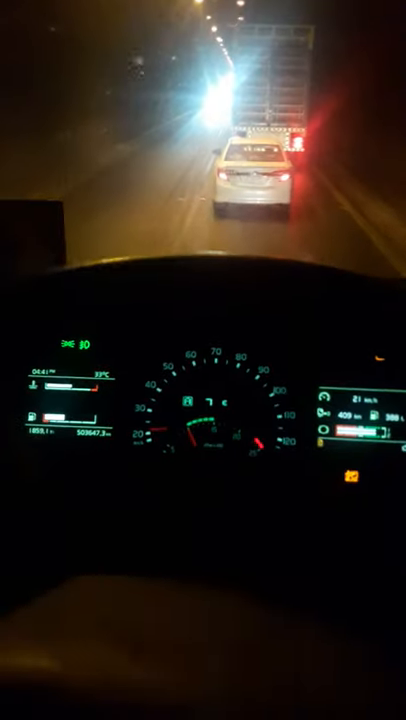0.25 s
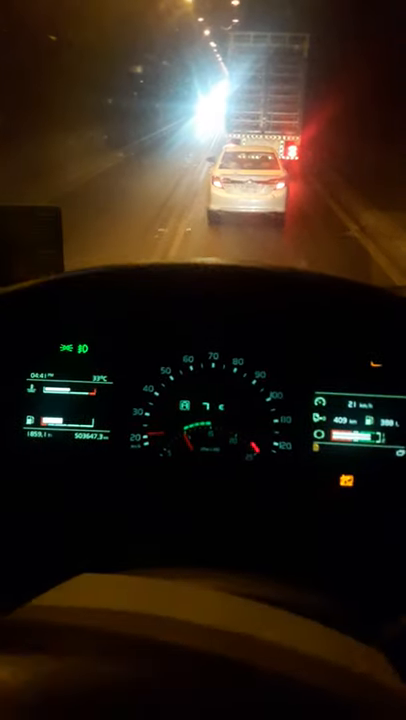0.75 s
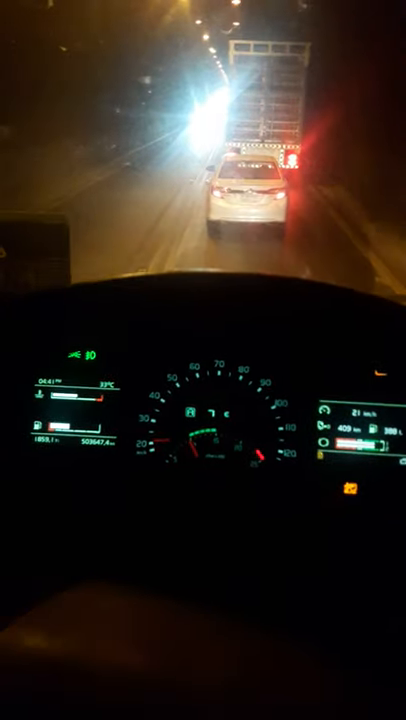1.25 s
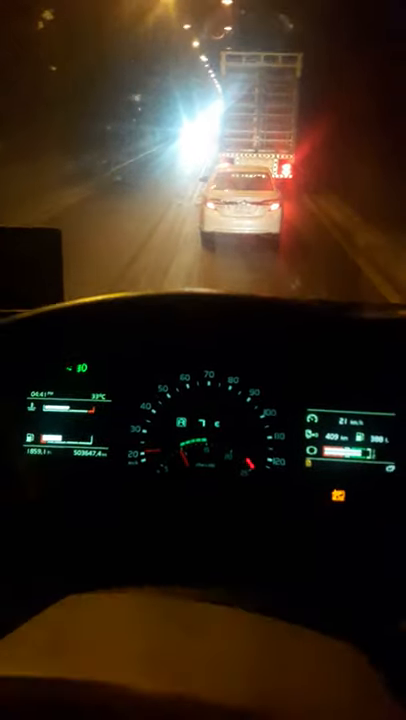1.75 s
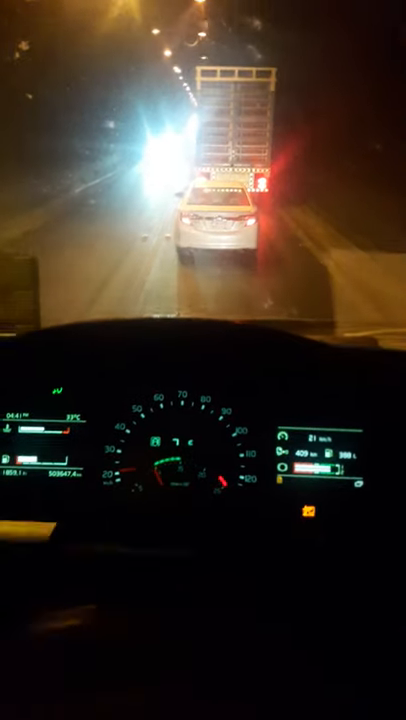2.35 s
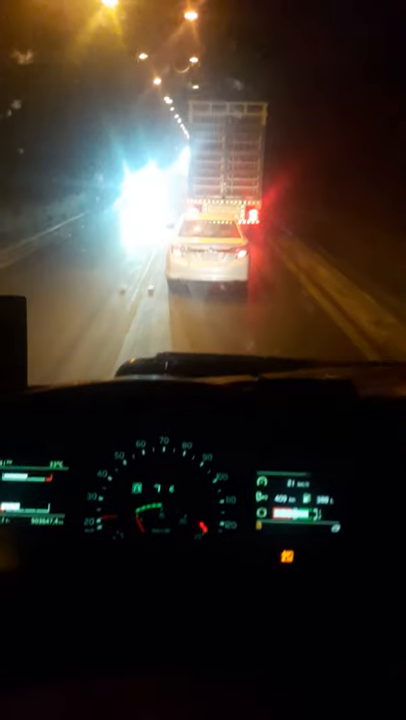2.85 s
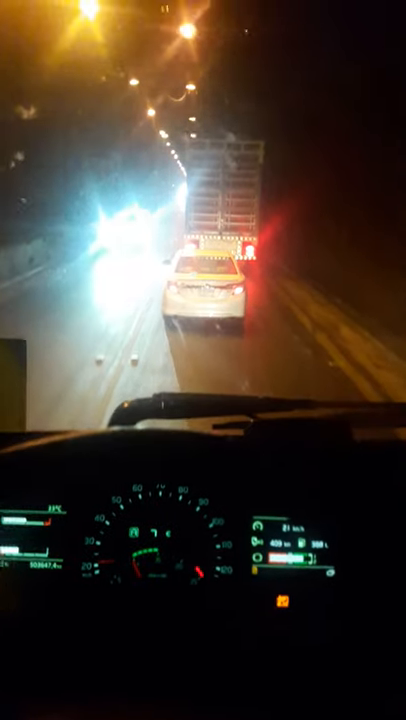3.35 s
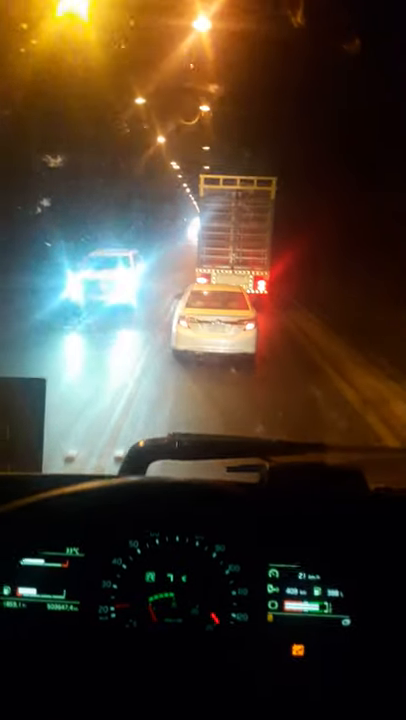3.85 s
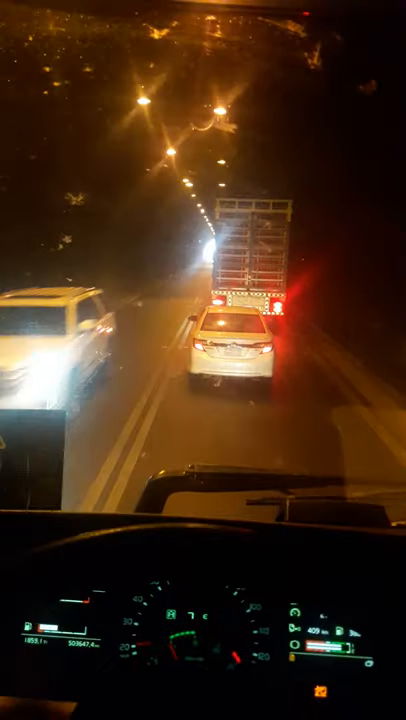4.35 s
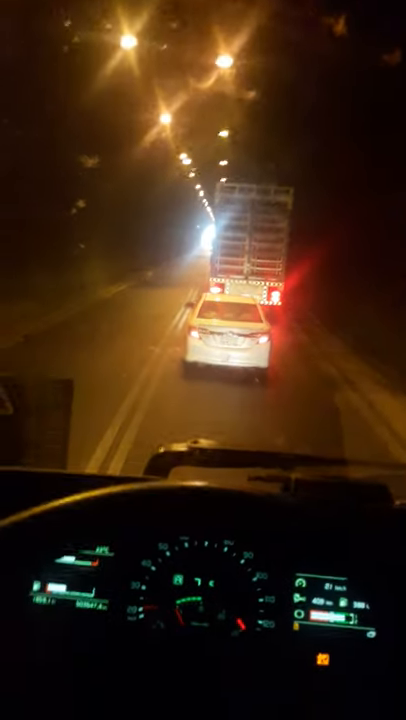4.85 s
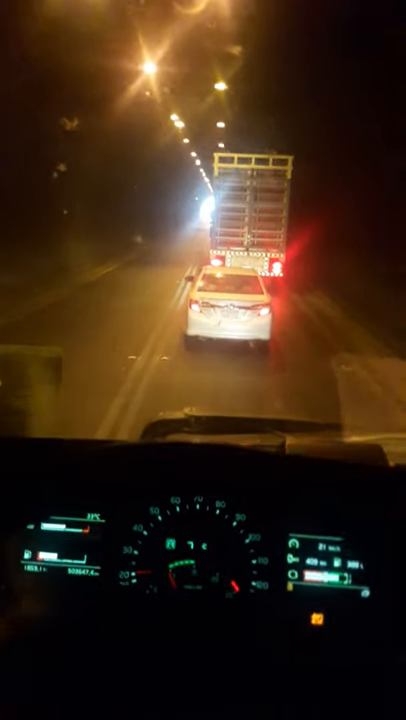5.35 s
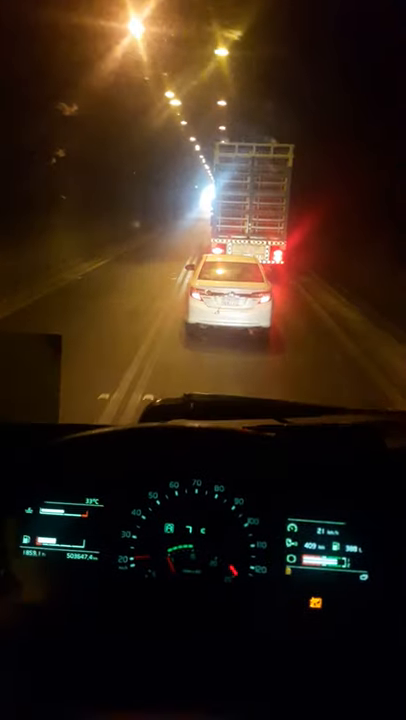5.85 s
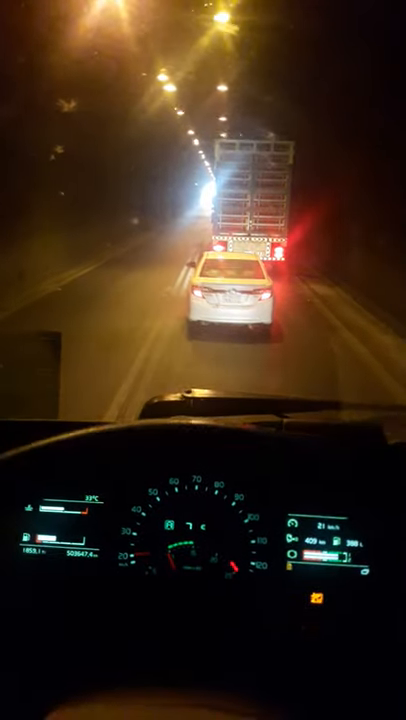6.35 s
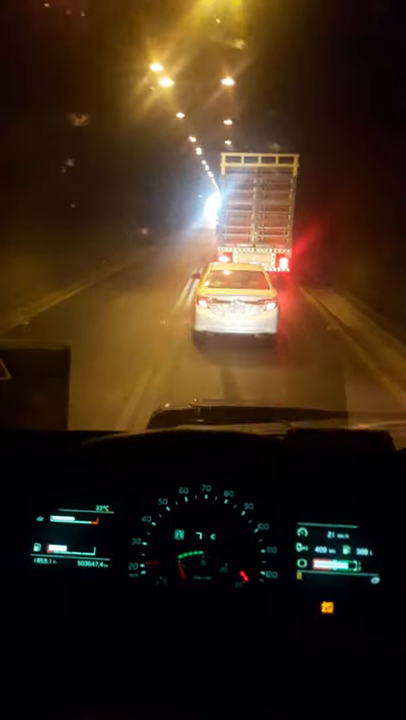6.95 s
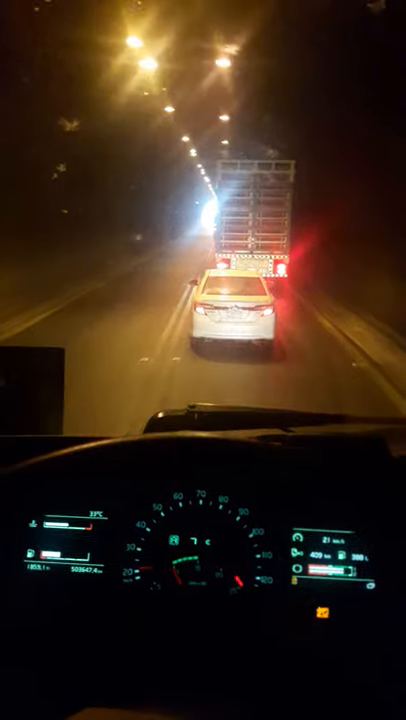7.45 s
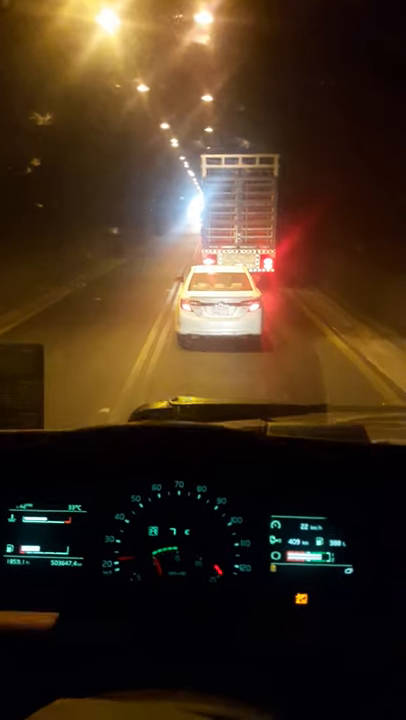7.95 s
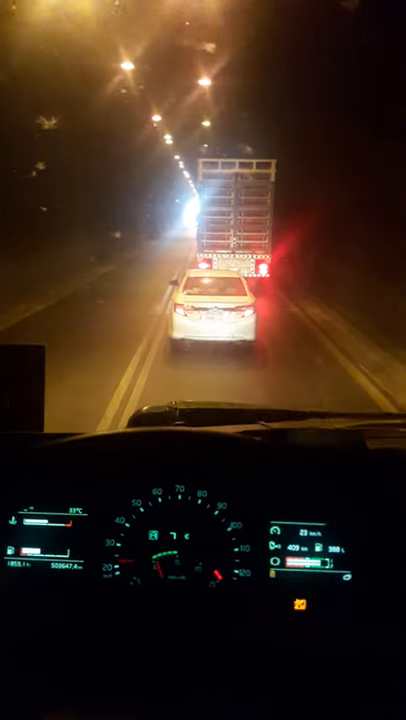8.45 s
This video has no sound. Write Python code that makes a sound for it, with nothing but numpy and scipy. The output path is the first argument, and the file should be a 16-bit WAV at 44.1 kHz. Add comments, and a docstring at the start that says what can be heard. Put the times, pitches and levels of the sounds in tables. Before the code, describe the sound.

Inside a moving heavy truck cab, heard from the driver's seat in close stereo. From 0 s a deep diesel drone near 100 Hz wavers over shaking panels, broad tyre roar with slight clatter, and a very thin hiss. A faint unsteady whistle around 1300 Hz swells to about 1 s, holds briefly and fades by 2 s. Driveline hums drift in and out, while a barely audible breathy turbo whine hovers above 4 kHz. Tiny soft ticks come about once a second from 0.7 s. The drone weakens from 4 s; the trim creaks once, quietly, at 5.1 s. At 6.1 s the bass falls abruptly, leaving the road roar exposed. At 7.3 s the throttle reopens: a strong boom arrives quickly, climbs slightly in pitch and fades after 7.8 s, over firmer rumble. A weaker whistle returns briefly near 8.5 s, and the sound ends around 8.7 s with the engine still running.

```python
"""A heavy diesel engine drones near 100 Hz, heard from the driver's seat inside the cab. The drone, its weaker
orders and the driveline hums are wavering sine waves; rumble, tyre roar and hiss are coloured noise.
The bass drops for about a second when the throttle lifts, then comes back harder with a boom rising in pitch.
A breathy turbocharger whine is narrow noise, and a thin whistle that comes and goes is an unsteady sine.
Something in the dashboard ticks faintly once a second and the trim creaks once: short puffs of noise."""
import sys
import numpy as np
from scipy import signal
from scipy.fft import rfft, irfft
from scipy.io import wavfile

SR = 44100
rng = np.random.default_rng(int(sys.argv[2]) if len(sys.argv) > 2 else 0)


def store_pcm(level_fs):
    """Save levels as 16-bit WAV."""
    pcm = np.round(np.clip(level_fs, -1, 1) * 32767).astype(np.int16)
    wavfile.write(sys.argv[1], SR, np.atleast_2d(pcm).T)


N = 382788
TIME = np.arange(N) / SR  # seconds
BIN_HZ = np.maximum(np.arange(N // 2 + 1) * SR / N, 1)  # frequency of each spectrum bin

# the throttle opens again at this moment
SURGE_S = 7.33


def undb(db):
    """Turn decibels into a gain."""
    return 10 ** (np.asarray(db) / 20)


def unit(x):
    """Scale to an rms (average strength) of 1."""
    return x / np.sqrt(np.mean(x ** 2))


def curves(rows):
    """Draw straight lines between the rows of a timed table: one curve over time per column."""
    seconds, *columns = np.transpose(rows)
    return [np.interp(TIME, seconds, column) for column in columns]


def over_hz(rows):
    """Join the rows of a frequency table with straight lines on a log frequency axis."""
    hz, value = np.transpose(rows)
    return np.interp(np.log(BIN_HZ), np.log(np.maximum(hz, 1)), value)


def colour(x, db):
    """Filter by a gain in dB at each frequency, then scale to rms 1."""
    return unit(irfft(rfft(x) * undb(db), N))


def walk(rate):
    """Smooth random motion with changes up to about rate in Hz, scaled to rms 1."""
    smoothing = 1 + (BIN_HZ / rate) ** 4
    return unit(irfft(rfft(rng.standard_normal(N)) / smoothing, N))


def swell(s, width_s):
    """A bell-shaped rise and fall around a moment."""
    return np.exp(-((TIME - s) / width_s) ** 2)


def turn(hz):
    """Add up a frequency curve into a running phase in radians."""
    return 2 * np.pi * np.cumsum(hz) / SR


def tone(phase, db, waver_db, jitter, rate):
    """A sine near the given rms level; its strength (dB) and phase (radians) waver at random."""
    gain = np.sqrt(2) * undb(db + waver_db * walk(rate))
    return gain * np.sin(phase + jitter * walk(rate))


def cab_noise():
    """Noise arriving from all around at two microphone ports: alike in the bass, unlike in the treble."""
    # likeness of the two ports: (frequency [Hz], correlation [-1 to 1])
    likeness = [(60, .99), (180, .98), (300, .88), (550, .65), (850, .4), (1300, -.25), (1550, -.35),
                (1900, -.2), (2500, .25), (3400, -.15), (4400, .1), (6000, 0)]
    alike = np.clip(over_hz(likeness), -.99, .995)
    mid, side = rfft(rng.standard_normal((2, N)))
    mid = mid * np.sqrt(1 + alike)
    side = side * np.sqrt(1 - alike)
    return irfft(np.array([mid + side, mid - side]), N)


def engine(phase, drone_db, load_db):
    """The main order booms in the cab; unequal cylinders add weaker, restless orders around it."""
    # weaker engine orders: (multiple of the main order [ratio], level before the load is added [dB])
    orders = [(4 / 6, -50), (5 / 6, -47.5), (7 / 6, -42), (8 / 6, -41.5), (9 / 6, -43.5), (10 / 6, -39.5),
              (2, -43.5), (14 / 6, -47.5), (3, -45.5)]
    drone = tone(phase, drone_db, waver_db=.9, jitter=.1, rate=12)
    weaker = sum(tone(ratio * phase, db + load_db, waver_db=2.5, jitter=0.7, rate=2.08)
                 for ratio, db in orders)
    return drone + weaker


def driveline(phase):
    """Shafts and gears hum at multiples of the engine's speed, each in a slow swell, over one deep hum."""
    # deep hum under the drone: (time [s], pitch [Hz], level [dB])
    deep_hum = [(0, 60.52, -40), (3.5, 60.5, -38), (5.9, 64.1, -34.5), (8.68, 65, -44)]
    # hums geared to the engine:
    # (time of the top [s], half length [s], multiple of the main order [ratio], level at the top [dB])
    geared_hums = [(0.597, .6, 2.205, -33.5), (1.697, 1, 1.68, -37), (2.4, .7, .765, -34.5),
                   (2.349, 0.4, 2.385, -33), (3.101, 1.6, 2.214, -33.5), (3.453, .65, 2.41, -35),
                   (4.199, 1.2, 2.022, -33.5), (4.298, .35, 1.72, -28.5), (5.148, .4, 1.67, -31),
                   (5.402, .7, 2.405, -39.5), (6.5, .35, 1.675, -29.5), (7.551, .7, 2.215, -33)]
    deep_hz, deep_db = curves(deep_hum)
    deep = tone(turn(deep_hz), deep_db, waver_db=2, jitter=.35, rate=6)
    geared = sum(swell(s, half_s) * tone(ratio * phase, db, waver_db=1.5, jitter=.3, rate=6)
                 for s, half_s, ratio, db in geared_hums)
    return deep + geared


def rumble(phase, load_db):
    """Floor and panels shake with the load, throbbing with the firings."""
    # colour of the rumble: (frequency [Hz], relative level [dB per Hz])
    spectrum = [(15, -34.5), (30, -22.5), (45, -5), (60, 2), (78, 7.5), (105, 7.5), (140, 4.5), (170, 7),
                (195, -0.5), (230, 4), (265, -2), (330, -0.5), (450, -8), (600, -13), (850, -30.5),
                (3000, -75)]
    throb = 1 + 0.19 * np.cos(phase)
    return colour(cab_noise() * throb, over_hz(spectrum)) * undb(-26.5 + load_db)


def road(phase):
    """Tyre roar rings the panels; diesel clatter pulses in it, and a thin hiss lies on top."""
    # colours of the roar and of the hiss: (frequency [Hz], relative level [dB per Hz])
    roar_spectrum = [(60, -10), (120, -2), (330, -0.5), (430, -6.5), (560, -6.5), (1000, -7.5), (1400, -12),
                     (1750, -14), (2300, -16.5), (2700, -21), (3100, -29), (3500, -33.5), (5500, -42),
                     (8000, -54.5)]
    hiss_spectrum = [(2500, -13), (3700, -1.5), (4400, 6.5), (5200, 3), (7000, -0.5), (8200, 2),
                     (8650, 3.5), (9100, -3.5), (10500, -2.5), (12000, 2.5), (15500, 2)]
    # panel resonances rung by the tyres: (frequency [Hz], width [Hz], boost [dB])
    panels = [(515, 98, 2.5), (675.5, 16, 8), (740, 44, -0.5), (840, 59, 4), (1230, 46, 0.5)]
    panels_db = sum(db / (1 + (2 * (BIN_HZ - hz) / width) ** 2) for hz, width, db in panels)
    clatter = 1 + 0.067 * np.cos(phase)
    # the small cabin has many close modes, which ripple the spectrum
    ripple_db = np.interp(BIN_HZ, np.arange(0, SR // 2, 20), rng.standard_normal(SR // 40 + 1))
    roar = colour(cab_noise() * clatter, over_hz(roar_spectrum) + panels_db + ripple_db)
    hiss = colour(cab_noise(), over_hz(hiss_spectrum))
    return roar * undb(-34.5 + 0.51 * walk(31)) + hiss * undb(-68 + .3 * walk(15))


def turbo():
    """The turbocharger's faint, breathy whine: a narrow band of noise around a moving pitch."""
    # course of the whine: (time [s], middle pitch [Hz], level [dB])
    whine = [(0, 3916, -79), (1.8, 4355, -69), (4.6, 4150, -74.5), (7, 4420, -66.5), (8.68, 4450, -66.5)]
    hz, db = curves(whine)
    phase = turn(hz)
    ports = [walk(220) * np.cos(phase) + walk(220) * np.sin(phase) for port in range(2)]
    return undb(db) * np.array(ports)


def whistle():
    """A thin unsteady whistle swells, holds and dies away, with a lower pitch when weak."""
    # whistles: (time of reaching full strength [s], attack [s], hold [s], level [dB])
    whistles = [(0.951, .45, .38, -41), (8.471, .07, 0.11, -44.5)]
    release_s = 0.21
    full_hz, sag_hz = 1305, 34.93  # pitch at the strongest moment, and the most it can sag below that
    strength = 0
    for s, attack_s, hold_s, db in whistles:
        rise = np.maximum(s - TIME, 0) / attack_s
        fall = np.maximum(TIME - s - hold_s, 0) / release_s
        strength = strength + undb(db) * np.exp(-rise - fall)
    hz = full_hz - sag_hz * (1 - strength / strength.max()) ** 2
    phase = turn(hz) + .85 * walk(28)
    # the two ports hear it well out of step, 2.3 radians apart
    return np.sqrt(2) * strength * undb(2.2 * walk(22)) * np.sin([phase, phase + 2.3])


def rustles(events, spectrum, width_s):
    """Small soft contacts, each a brief, grainy swell of coloured noise."""
    strength = sum(undb(db) * swell(s, width_s) for s, db in events)
    grain = undb(2.9 * walk(90))
    return strength * grain * colour(cab_noise(), over_hz(spectrum))


def dashboard_ticks():
    """Something in the dashboard ticks: a small contact about once a second."""
    # ticks: (time [s], level before the grain [dB])
    ticks = [(.685, -64), (1.68, -60), (2.675, -65), (3.685, -62.5), (4.685, -60), (5.68, -56.5),
             (6.68, -56.5), (7.685, -57.5)]
    # colour of a tick: (frequency [Hz], relative level [dB per Hz])
    spectrum = [(2500, -24), (3700, -2), (4500, 5), (5200, -11), (6500, -20.5), (12000, -30)]
    return rustles(ticks, spectrum, width_s=.024)


def trim_creak():
    """The trim gives one short creak, a contact with a brighter colour than the ticks."""
    # creak: (time [s], level before the grain [dB])
    creaks = [(5.128, -54.5)]
    # colour of the creak: (frequency [Hz], relative level [dB per Hz])
    spectrum = [(1500, -11), (3500, 6), (6500, -2), (8500, -5), (10000, -12), (15000, -23)]
    return rustles(creaks, spectrum, width_s=0.013)


def surge():
    """The opened throttle booms: a quick attack, a steady climb in pitch, a fade, and a growl an octave below."""
    attack_s, hold_s, fade_db_per_s = 0.065, 0.46, 16
    start_hz, climb_hz_per_s = 99.8, 6.33
    age = np.maximum(TIME - SURGE_S, 0)
    boom_db = -20 - fade_db_per_s * np.maximum(age - hold_s, 0)
    phase = turn(start_hz + climb_hz_per_s * age)
    boom = tone(phase, boom_db, waver_db=.9, jitter=.1, rate=12)
    growl = tone(phase / 2, -42, waver_db=1.5, jitter=.3, rate=6)
    return (boom + growl) * np.minimum(age / attack_s, 1)


def scene():
    """Add up the cab's sounds; engine speed and load steer several of them together."""
    # main engine order: (time [s], pitch [Hz])
    speed = [(0, 101), (.9, 97.8), (2.7, 99.4), (4.2, 98), (6.15, 96.2), (7.2, 100.2), (7.8, 99.6),
             (8.68, 101.5)]
    # strength of the drone before the lull: (time [s], level [dB])
    drone_level = [(0, -23), (.55, -25.5), (.8, -28.5), (1.5, -24.5), (4.1, -26.3), (5.1, -31.5),
                   (6.1, -35.5), (6.7, -28), (7.3, -21.5), (7.6, -36), (8.68, -28.5)]
    # the booming stops short and swells back: (time [s], share of the lull [0 to 1])
    lull = [(6.066, 0), (6.074, 1), (7.335, 1), (7.385, 0)]
    phase = turn(curves(speed)[0])
    drone_db = curves(drone_level)[0]
    # the cab shakes a little harder as the drone grows, and harder again once the throttle is open
    load_db = -1 + 0.14 * (drone_db - drone_db.mean()) + 1.9 * (TIME > SURGE_S)
    bass = engine(phase, drone_db, load_db) + driveline(phase) + rumble(phase, load_db) + surge()
    # the lull takes only what comes through the cab's frame; airborne noise carries on
    lull_gain = undb(-8.5 * curves(lull)[0])
    airborne = road(phase) + turbo() + whistle()
    return bass * lull_gain + airborne + dashboard_ticks() + trim_creak()


def record(dry):
    """Two microphone ports differ in colour and timing; a steep low-pass cuts off the top."""
    # level of the left port over the right: (frequency [Hz], difference [dB])
    balance = [(60, -3.7), (130, -2), (240, -5.5), (330, -3), (500, -1.7), (1300, -3), (1750, -4),
               (2200, -6.5), (2800, 3.7), (3600, 2.5), (4400, -2), (8000, -1.3), (8800, 3.3), (15000, .5)]
    # how far the left port leads the right: (frequency [Hz], phase [rad])
    lead = [(50, .18), (280, .1), (420, .45), (900, .5), (1500, 0)]
    top_hz = 15700
    ends = np.clip(np.minimum(TIME, TIME[-1] - TIME) / .006, 0, 1)  # 6 ms fades
    # each port takes half of the difference, in opposite directions
    half = np.sqrt(undb(over_hz(balance)) * np.exp(1j * over_hz(lead)))
    ports = irfft(rfft(dry * ends) * np.array([half, 1 / half]), N)
    return signal.sosfilt(signal.ellip(10, .1, 80, top_hz, fs=SR, output="sos"), ports)


dry = scene()
out = record(dry)
store_pcm(out)
```